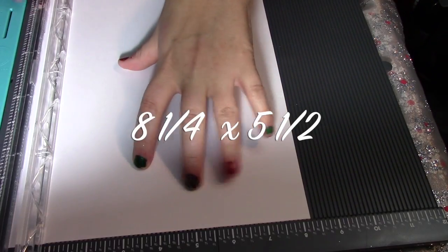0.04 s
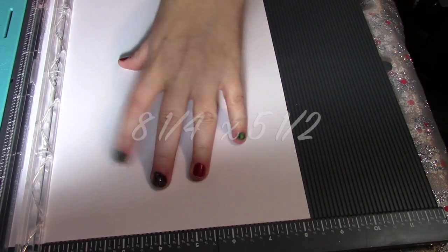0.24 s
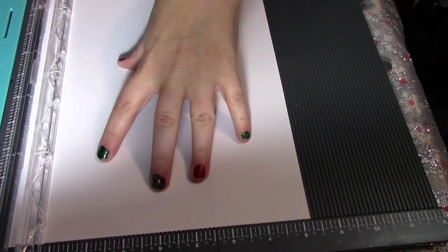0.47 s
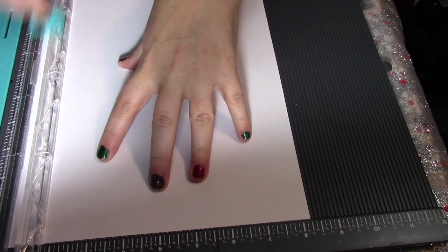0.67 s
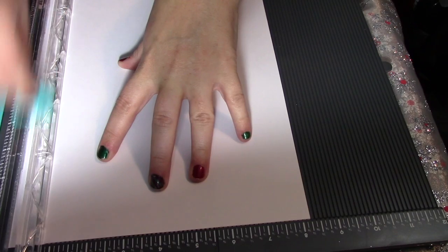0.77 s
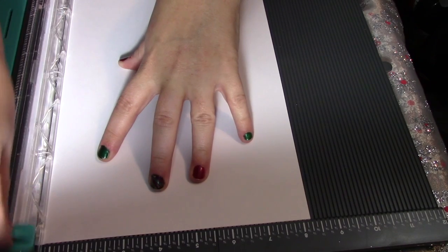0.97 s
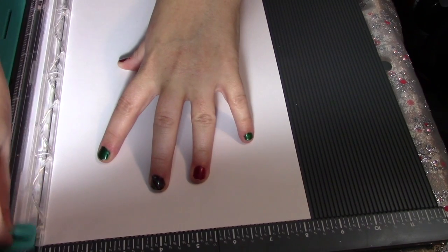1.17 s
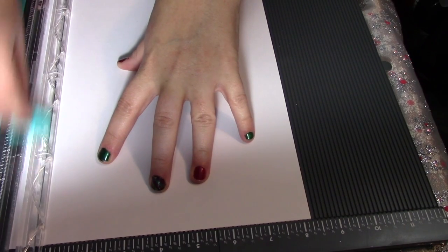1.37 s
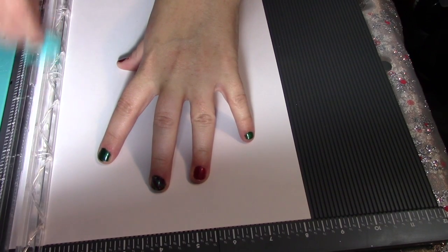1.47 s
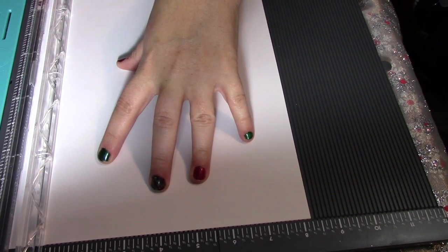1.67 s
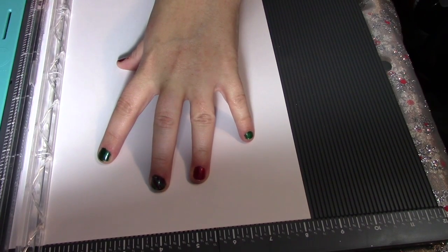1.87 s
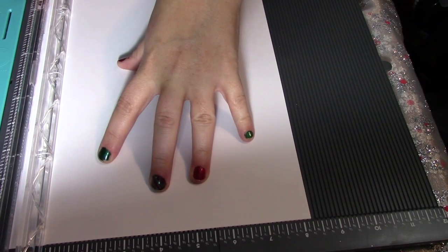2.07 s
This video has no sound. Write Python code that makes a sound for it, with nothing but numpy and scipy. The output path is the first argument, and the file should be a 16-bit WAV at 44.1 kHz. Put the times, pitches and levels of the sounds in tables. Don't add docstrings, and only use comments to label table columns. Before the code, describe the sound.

A paper trimmer cuts card, heard close in a small quiet room with faint hiss. Fingernails tap near 0.2 seconds; the plastic rail snaps down at 0.27 and settles at 0.42. The blade bites at 0.57, rasping and catching until a slam at 1.0. Small knocks precede a quieter, juddering return from 1.2 to 1.7. The rail clicks up loudly at 1.76, settles at 1.9, then faint touches.

```python
import sys
import numpy as np
from scipy import signal
from scipy.fft import rfft, irfft
from scipy.io import wavfile
from scipy.ndimage import uniform_filter1d

SR = 44100
rng = np.random.default_rng(int(sys.argv[2]) if len(sys.argv) > 2 else 0)


def to_linear_factor(level_db):
    exponent = np.asarray(level_db, float) / 20
    return 10 ** exponent


def dump_mix(stems):
    frames = np.atleast_2d(stems).T
    limited = np.clip(frames, -1, 1)
    pcm = np.round(limited * 32767).astype(np.int16)
    wavfile.write(sys.argv[1], SR, pcm)


N = 93315
T = np.arange(N) / SR


def unit(x):
    return x / np.sqrt(np.mean(x ** 2))


def reson(x, hz, width_hz):
    return signal.lfilter(*signal.iirpeak(hz, hz / width_hz, fs=SR), x)


def butter(x, order, hz, kind="low"):
    return signal.sosfilt(signal.butter(order, hz, kind, fs=SR, output="sos"), x)


def walk(rate_hz):
    hold = int(SR / rate_hz)
    steps = np.repeat(rng.standard_normal(N // hold + 1), hold)
    return unit(uniform_filter1d(steps, hold)[:N])


# f/Hz, density/dB per Hz
FLOOR_SPECTRUM = [(24, -62), (40, -18.5), (171, -2), (444, -3), (529, -5.5), (1520, -12.5), (2050, -13.5),
                  (2570, -15), (16000, -32)]


def room_tone():
    hz, db = np.array(FLOOR_SPECTRUM).T
    bins_hz = np.fft.rfftfreq(N, 1 / SR)
    gain = to_linear_factor(np.interp(np.log(bins_hz + 1), np.log(hz), db))
    noise = irfft(rfft(rng.standard_normal(N)) * gain, N)
    return unit(noise) * to_linear_factor(-56.5 + 1.1 * walk(8))


# t/s, length/s, level/dB
SLIDES = [
    (0.046, 0.047, -47.5),
    (0.224, 0.04, -49),
]


def finger_slides():
    hz, width_hz, body_db = 7160, 4500, -19.5
    noise = rng.standard_normal(N)
    hiss = unit(reson(reson(np.gradient(noise), hz, width_hz), hz, width_hz))
    body = to_linear_factor(body_db) * unit(reson(noise, 500, 300))
    env = sum(to_linear_factor(db) * np.sin(np.pi * np.clip((T - s) / length, 0, 1)) ** 0.46
              for s, length, db in SLIDES)
    return (hiss + body) * env


def ring(modes, chance, push, longest_s):
    scatter_db, detune = 1.5, .012
    t = T[:SR // 4]
    y = 0
    for (hz, db, t60), c in zip(modes, chance):
        decay = to_linear_factor(-60 * t / np.clip(t60, .003, longest_s))
        swell = signal.fftconvolve(push, decay)[:len(t)]
        tone = np.sin(2 * np.pi * hz * (1 + detune * c[1]) * t + 3 * c[2])
        y = y + to_linear_factor(db + scatter_db * c[0]) * tone * swell
    return y / np.abs(y).max()


def shudder(modes, noise, shape, tail_db, top_hz):
    t60_s, t60_slope, rise_s, q = 0.16, -0.31, .007, 2.2
    crack_db, crack_top_hz = -10.5, 6500
    t = T[:SR // 4]
    tail, crack = 0, 0
    for hz, db, _ in modes:
        band = unit(reson(reson(noise, hz, hz / q), hz, hz)) * to_linear_factor(db / 2)
        tail = tail + band * to_linear_factor(tail_db - 60 * t / (t60_s * (hz / 2000) ** t60_slope))
        crack = crack + band
    tail = butter(tail * np.clip(t / rise_s, 0, 1), 4, top_hz)
    crack = butter(crack * to_linear_factor(crack_db) * shape / shape.max(), 2, crack_top_hz)
    return (tail + crack) / np.sqrt(len(modes))


# f/Hz, level/dB, t60/s
BOARD = [(129, -7.5, 0.078), (247.4, -3.5, 0.11), (340, -0.5, 0.088), (487, 3, 0.034), (600, -0.5, 0.048),
         (714, 4, 0.035), (816, 1, 0.063)]


def hits(rows, modes, tail_db, top_hz=4260):
    tick_hz, tick_width_hz = 7460, 4100
    out, t = np.zeros(N), T[:SR // 4]
    for s, db, thump_db, tick_db, rattle_ms in rows:
        u = t / (max(rattle_ms, .3) / 1000)
        shape = u ** .6 * np.exp(-u ** 4 * 1.5)
        noise, chance = rng.standard_normal((3, len(t))), rng.standard_normal((2, 14, 3))
        push = (shape * (1 + noise[0] ** 2))[:1024]
        part = ring(modes, chance[0], push, longest_s=.022)
        thump = ring(BOARD, chance[1], shape[:1024], longest_s=0.14)
        tick = reson(reson(shape * noise[1], tick_hz, tick_width_hz), tick_hz, tick_width_hz * 2)
        tick = tick / np.abs(tick).max()
        y = part + to_linear_factor(thump_db - 4.0) * thump + to_linear_factor(tick_db - 6.5) * tick
        y = y + shudder(modes, noise[2], shape, tail_db, top_hz)
        i = int(s * SR)
        out[i:i + len(y)] += to_linear_factor(db) * y[:N - i]
    return out


# f/Hz, level/dB, t60/s
FINGER_HITS = [
    (.1733, -33.5, 1.5, 12, 3.2),
    (.1786, -33.5, -4, 17, 2.5),
    (.225, -37.5, 15, -13, 0.79),
    (.237, -39.5, 13, -16, 2),
    (.3206, -45.5, 9.5, -32, 1.1),
    (.3275, -48, 4, 15.5, 4.2),
    (1.9634, -52, -6, -11, 2.5),
    (1.9674, -53.5, -10, 9.5, 5.5),
    (2.0915, -53.5, -6, 15, 1.3),
]
FINGER = [(940, 16, 0.0036), (1655, 8, 0.011), (2660, 2, 0.014), (3410, -12, 0.014)]


def finger_taps():
    return hits(FINGER_HITS, FINGER, tail_db=-20.0)


BOUNCE_HITS = [
    (.2545, -28, -7, -40, 3.8),
    (.2897, -22.5, -9, -30, 1.3),
    (.294, -24, -4, -35, 4.3),
    (1.6575, -17.5, -5.5, -19, 3),
    (1.665, -29, -6, -37, 3.8),
]
BOUNCE = [(600, -1, 0.011), (880, -4.5, 0.0081), (1265, 1, 0.01), (1615, -4.5, 0.011), (2180, -3, 0.012),
          (2950, -5.5, 0.013), (3520, -7.5, 0.011)]


def bounces():
    return hits(BOUNCE_HITS, BOUNCE, tail_db=-27)


CLAMP_HITS = [
    (.267, -8.5, -24, -40, 2.46),
    (.2735, -25, -8, -40, 3.5),
    (.2795, -26, -13, -40, 4),
]
CLAMP = [(850, -11.5, 0.015), (1767, 0.5, 0.017), (2200, -3.5, 0.0055), (2620, -4.5, 0.0088),
         (3262, -5.5, 0.0075), (3710, -3, .007), (4140, -1, 0.015), (5120, -17.5, 0.0068),
         (6030, -13, 0.0095)]


def rail_clamp():
    return hits(CLAMP_HITS, CLAMP, tail_db=-19)


# centre t/s, length/s, f/Hz, level/dB
CHATTER = [(0.665, 0.024, 1545, -31.5), (0.727, 0.061, 688, -29.5), (.755, 0.02, 706, -25),
           (0.776, 0.015, 680, -24.5), (0.788, 0.021, 1590, -27), (0.791, 0.021, 890, -28.5),
           (0.827, 0.032, 810, -24), (0.845, 0.023, 783, -25), (.895, 0.039, 664, -28),
           (0.736, 0.014, 2950, -28), (0.834, .02, 3225, -30.5), (0.853, 0.027, 2070, -33),
           (.975, .02, 1340, -36), (0.343, 0.056, 600, -52.5), (0.595, 0.028, 384, -29.5),
           (1.385, 0.018, 1216, -29), (1.384, 0.01, 3050, -31), (1.449, 0.013, 1620, -28.5),
           (1.474, 0.032, 1480, -36), (1.493, 0.02, 3020, -32), (1.498, 0.011, 600, -34.5),
           (1.526, 0.0099, 3250, -30.5), (1.522, 0.012, 4460, -35), (1.547, 0.026, 1636, -29),
           (1.558, 0.026, 3060, -32.5), (1.584, 0.028, 1440, -33), (1.575, 0.021, 3700, -35.5)]


def chatter():
    out = np.zeros(N)
    for s, length, hz, db in CHATTER:
        env = np.exp(-((T - s) / (length / 2)) ** 2)
        tone = env * reson(rng.standard_normal(N), hz, 80)
        out += to_linear_factor(db) * tone * np.sqrt(np.sum(env ** 2) / np.sum(tone ** 2))
    return out


SETTLE_HITS = [
    (0.4178, -23, -12.5, -45, 1.67),
    (1.8909, -18.5, -12.5, -36, 0.78),
    (1.899, -24.5, -1, -45, 6.5),
]
SETTLE = [(676, -1, 0.0051), (1190, -2.5, 0.0066), (1590, -5, 0.0023), (1730, 1, 0.0054),
          (2250, -5.5, 0.011), (2680, -5.5, 0.011), (3064, -8, 0.019), (3150, -6, 0.012),
          (3700, -11, 0.021), (4200, -21.5, 0.0048)]


def rail_settle():
    return hits(SETTLE_HITS, SETTLE, tail_db=-16.5)


# f/Hz, width/Hz, level/dB
DRAG = [(1093, 86, -5.5), (1154, 120, -2.5), (1450, 300, -3), (1764, 85, -3), (2095, 670, -3),
        (2560, 340, -1), (3060, 440, 1), (3794, 150, -5), (4285, 133, -9.5)]
HISS = [(4860, 3300, 5.5), (6500, 810, 6), (6850, 840, 1), (8700, 1040, 5), (9680, 930, 3),
        (10900, 2300, -1), (12630, 1400, -6.5)]
RUMBLE = [(149.3, 60, -13.5), (246.7, 34, -7.5), (347.6, 45, -4), (500, 96, -5), (623, 56, -3),
          (722, 65, -2.5), (867, 300, -0.5)]


def stroke(curve, bumps):
    grains_per_s, spread_db, flicker_db = 6500, 2.1, 1.9
    c = np.array(curve).T
    drag_db, hiss_db, rumble_db = [np.interp(T, c[0], row) for row in c[1:]]
    on = uniform_filter1d(((T > c[0, 0]) & (T < c[0, -1])) * 1., size=200)
    judder_db = sum(db * np.exp(-((T - s) / (length / 2)) ** 2) for s, length, db in bumps)
    out, shared = 0, walk(60)
    layers = ((DRAG, judder_db),
              (HISS, hiss_db + 0.18 * judder_db),
              (RUMBLE, rumble_db + .5 * judder_db))
    for bands, db in layers:
        chance = rng.random((3, N))
        struck = (chance[0] < grains_per_s / SR) * np.sign(chance[1] - .5)
        grains = struck * to_linear_factor(-spread_db * np.log(1 - chance[2]))
        layer = 0
        for k, (hz, width_hz, band_db) in enumerate(bands):
            gain = to_linear_factor(band_db + flicker_db * walk(70))
            layer = layer + (-1) ** k * gain * unit(reson(grains, hz, width_hz))
        out = out + unit(layer) * to_linear_factor(db + 0.51 * shared)
    return out * on * to_linear_factor(drag_db)


# t/s, drag level/dB, blade hiss/dB rel, board rumble/dB rel
CUT = [(.43, -67, -9, 7), (.5, -58, -5.5, 2.5), (.565, -49, -4.5, -4.5), (.577, -35.5, -7, 8),
       (.592, -28, -4.5, -6.5), (.68, -27.5, 0.5, -4.5), (.8, -26.5, -2, -5), (.92, -28, -2.5, -2.5),
       (1.006, -33, -4, -4)]


def cutting_stroke():
    return stroke(CUT, [])


CARRIAGE_HITS = [
    (.5737, -13, -1, -30, 3.4),
    (1.1437, -31.5, -3, -2, 4.9),
    (1.1562, -32.5, 4, -28, 5.9),
    (1.1707, -25.5, -5.5, -1, 3.2),
    (1.705, -33.5, -22, -3, 4.7),
]
CARRIAGE = [(1241, 4.5, 0.017), (1596, 7.5, 0.0076), (2180, -4, 0.0078), (2830, 0, 0.012),
            (3150, -14, 0.012), (3900, -11.5, 0.018)]


def carriage_knocks():
    return hits(CARRIAGE_HITS, CARRIAGE, tail_db=-15)


CATCH_HITS = [
    (.631, -24, -11, -12, 2.5),
    (.744, -17.5, -10, -12, 2.3),
    (.785, -13.5, -10, -16, 1.7),
    (.823, -24, 5, -17, 3.5),
    (1.383, -22.5, -26, -18, 2.1),
]
STOP = [(1177, -8, .007), (1650, -3.5, 0.011), (2090, -4, 0.0058), (2306, -5, 0.0053), (2750, -2.5, 0.0085),
        (3307, -3, 0.0079), (3700, -7.5, 0.0046), (4220, -4, 0.0077), (4900, -25, 0.0029),
        (5640, -10, .006)]


def blade_catches():
    return hits(CATCH_HITS, STOP, tail_db=-35)


STOP_HITS = [
    (1.0058, -5, -11.5, -11, 4.5),
    (1.0125, -18, 0.5, -39, 3.7),
]


def end_stop():
    return hits(STOP_HITS, STOP, tail_db=-21.5, top_hz=7000)


# t/s, drag level/dB, blade hiss/dB rel, board rumble/dB rel
RETURN = [(1.18, -57, -1, 7), (1.215, -48.5, -10, -3), (1.24, -41.5, -0.5, -4), (1.35, -39.5, -4, -1),
          (1.43, -39, -0.5, 1), (1.55, -33.5, -10.5, -2.5), (1.63, -37, -12, -2.5), (1.69, -48, -12, 9),
          (1.755, -51, -3, -63)]
# t/s, length/s, gain/dB
JUDDER = [(1.249, 0.017, 7), (1.288, 0.023, 7.5), (1.394, 0.015, 5.5), (1.443, 0.0074, 6.5),
          (1.476, 0.032, 9), (1.526, .012, -1.5), (1.557, .014, -2), (1.586, 0.014, 1)]


def return_stroke():
    return stroke(RETURN, JUDDER)


RAIL_HITS = [
    (1.7605, -0.5, -23.5, -10, 3.47),
    (1.7725, -17, -9.5, -32, 4),
]
RAIL = [(850, -17, 0.0087), (1400, -13, 0.021), (1777, -1, 0.011), (2080, -15, 0.01), (2440, -3.5, 0.0074),
        (3050, -9.5, .006), (3672, 5.5, 0.0068), (4250, -6, 0.008), (4906, -8, .006), (6020, -8.5, 0.01),
        (7530, -20.5, 0.0036)]


def rail_release():
    return hits(RAIL_HITS, RAIL, tail_db=-17, top_hz=7000)


def room(x):
    delay_s, level_db = 0.0018, -6.5
    t = T[:SR // 2]
    tail = 0
    for hz in 125 * 2. ** np.arange(7):
        t60_s = np.interp(np.log(hz), np.log([400, 2500, 10000]), [0.29, 0.095, 0.15])
        band = unit(reson(rng.standard_normal(len(t)), hz, hz / 0.54))
        tail = tail + band * np.sqrt(hz) * to_linear_factor(-60 * t / t60_s)
    tail = butter(tail, 1, 5000) * np.clip(t / delay_s - 1, 0, 1)
    return signal.fftconvolve(x, tail / np.sqrt(np.sum(tail ** 2)))[:N] * to_linear_factor(level_db)


def patchy(x):
    share, band_bins, hold_frames = .16, 24, 2
    z = signal.stft(x, nperseg=2048)[2]
    keep = rng.random((z.shape[0] // band_bins + 1, z.shape[1] // hold_frames + 1)) < share
    keep = np.repeat(np.repeat(keep, band_bins, axis=0), hold_frames, axis=1)
    return signal.istft(z * keep[:z.shape[0], :z.shape[1]], nperseg=2048)[1][:N]


def lean(x):
    return to_linear_factor(-38) * butter(x, 2, 2100, "high") + to_linear_factor(-15.5) * np.gradient(x)


def scene():
    knocks = rail_release() + rail_settle() + end_stop() + carriage_knocks()
    knocks = knocks + finger_taps() + rail_clamp() + bounces() + blade_catches()
    rubs = cutting_stroke() + return_stroke() + finger_slides() + chatter()
    rubs = signal.sosfilt(signal.ellip(8, .3, 50, 15900, fs=SR, output="sos"), rubs)
    send = to_linear_factor(-15) * knocks + to_linear_factor(-7) * rubs
    mid = knocks + rubs + room(send) + room_tone()
    air = to_linear_factor(-9.5) * butter(room_tone(), 6, 2500)
    room_treble = to_linear_factor(-16) * butter(room(send), 2, 3800, "high")
    side = lean(knocks) * to_linear_factor(-5) + patchy(lean(rubs) + room_treble)
    side = side + air + to_linear_factor(-63) * room(send)
    return np.array([mid + side, mid - side])


def band_limit(x):
    return signal.sosfilt(signal.butter(12, 16610, fs=SR, output="sos"), x)


def record(dry):
    gap_s, gap_width_s, fade_s = 2.0865, .0045, .004
    x = butter(dry, 3, 95, "high")
    x = x * (1 - np.exp(-((T - gap_s) / gap_width_s) ** 2))
    x = x * np.clip((T[-1] - T) / fade_s, 0, 1)
    x = butter(x, 4, 15500)
    return band_limit(x)


dry = scene()
out = record(dry)
dump_mix(out)
```